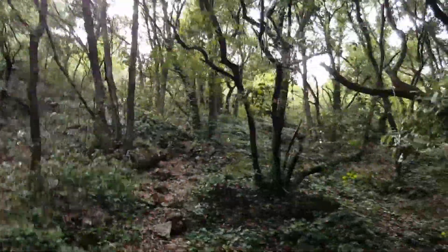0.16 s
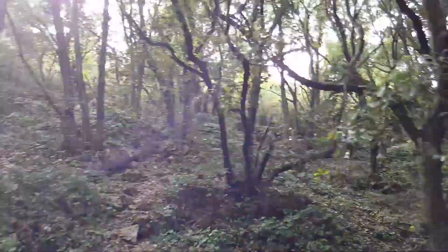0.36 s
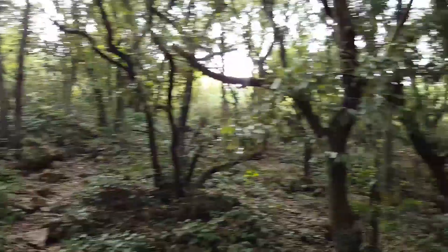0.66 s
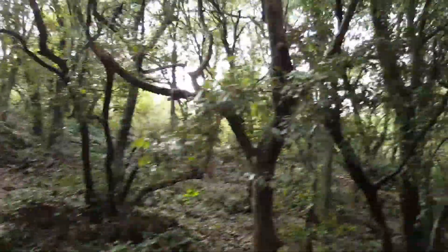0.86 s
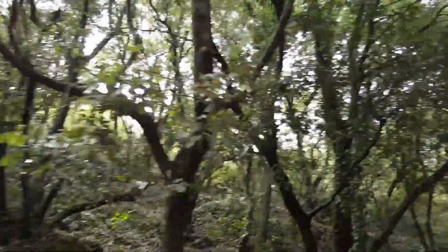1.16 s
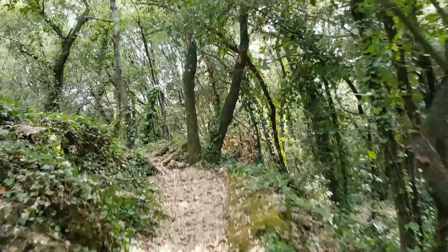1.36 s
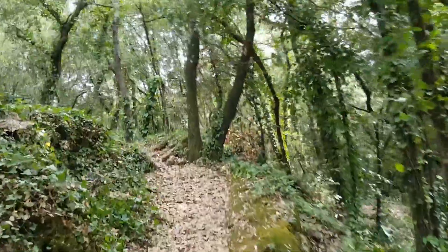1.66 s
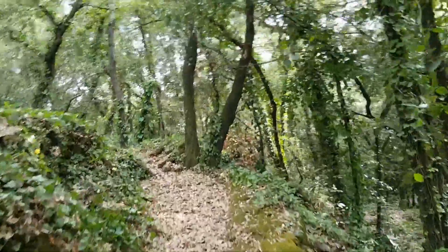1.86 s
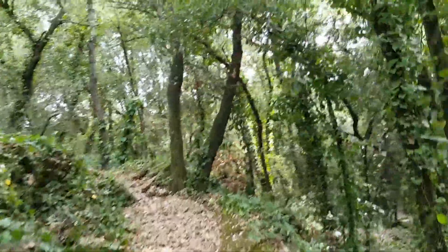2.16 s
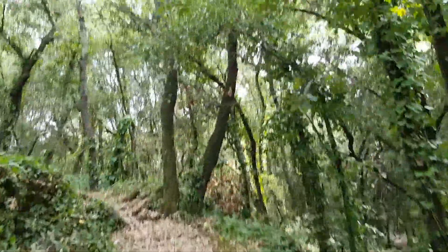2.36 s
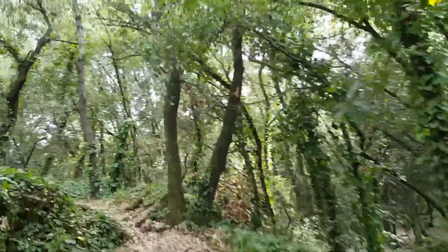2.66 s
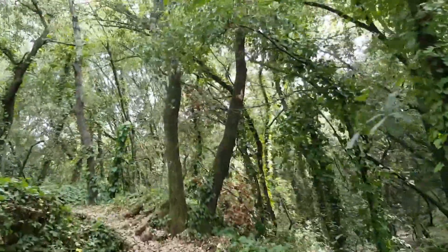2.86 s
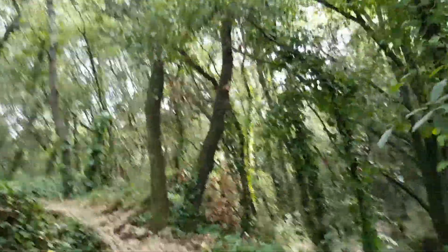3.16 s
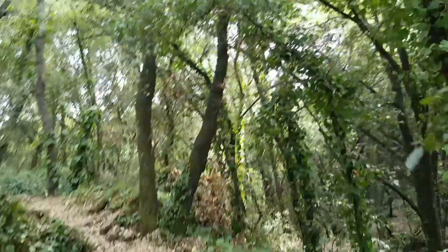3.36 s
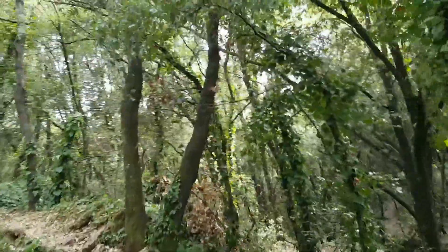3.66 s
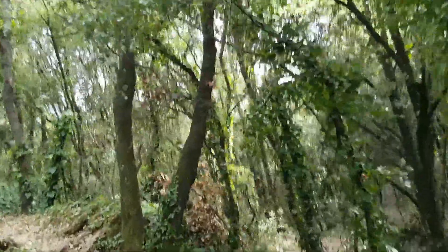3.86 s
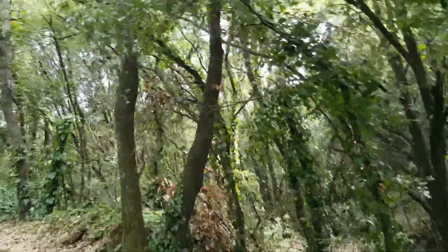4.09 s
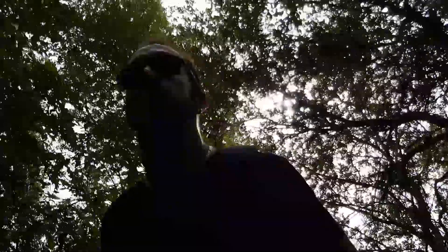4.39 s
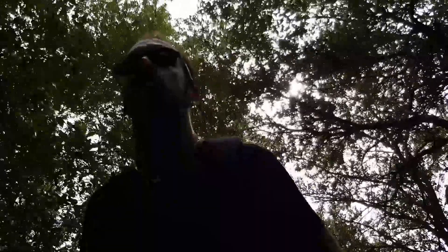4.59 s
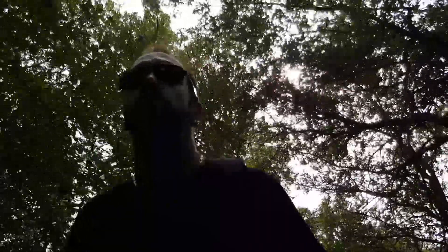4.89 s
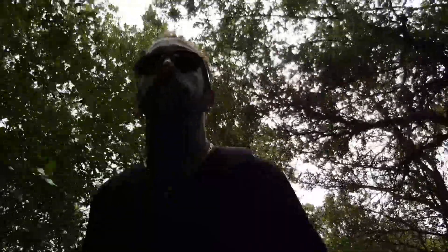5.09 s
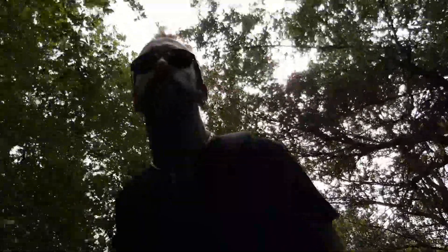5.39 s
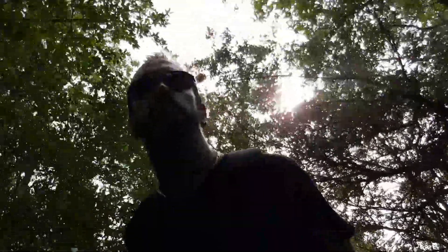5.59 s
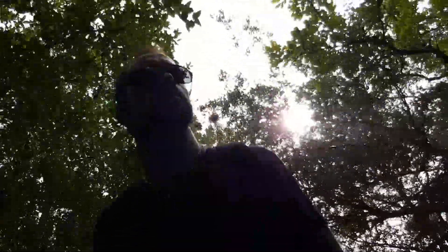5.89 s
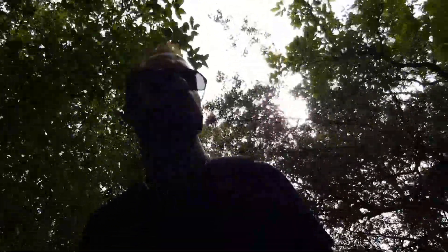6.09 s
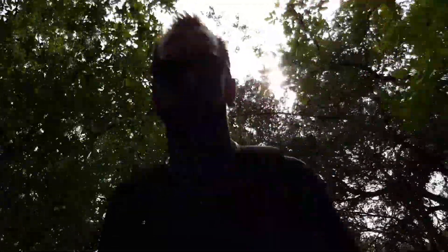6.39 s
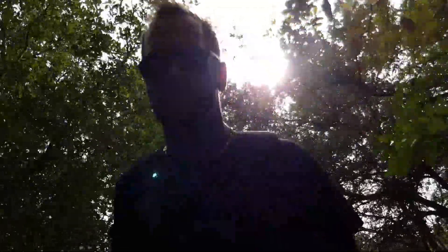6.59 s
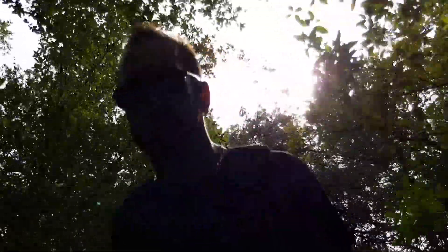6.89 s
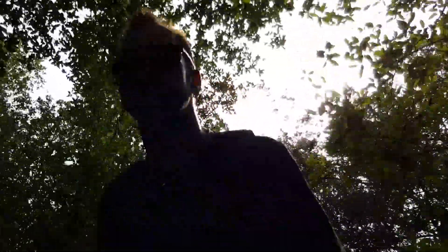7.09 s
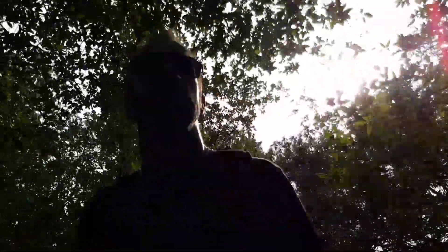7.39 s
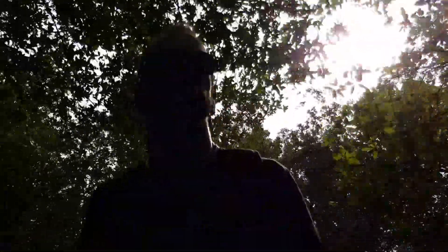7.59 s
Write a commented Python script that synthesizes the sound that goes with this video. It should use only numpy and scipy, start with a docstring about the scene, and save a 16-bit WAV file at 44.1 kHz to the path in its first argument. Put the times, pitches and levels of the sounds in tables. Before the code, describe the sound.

Summer woodland filled with bright, dry, rasping cicadas. Each near singer makes rapid bursts of fine clicks at its own pace, so the pulses interlock into a shimmering, rattling texture. A softer far crowd and a steady hush of air and leaves fill the gaps. Faint handling rumble fades early; low uneven noise peaks halfway. The level stays even throughout, with short diffuse echoes and very wide stereo.

```python
"""From the first moment four near cicadas rasp in summer woodland, each chirping at its own tempo to the end.
Each chirp is a run of tymbal clicks that ring the insect's body and scatter among trunks and leaves.
Narrow whistles swell with three of the singers; a blurred crowd of far ones and a soft wash lie beneath.
A faint rumble of a camera being swung sinks over the opening seconds; soft, uneven low noise in the centre
is strongest near 3.5 s. The stereo is very wide throughout, with a faint wavering hum in its centre."""
import sys
import numpy as np
from scipy import signal
from scipy.fft import rfft, irfft, next_fast_len
from scipy.io import wavfile
from scipy.ndimage import uniform_filter1d, minimum_filter1d

SR = 44100
rng = np.random.default_rng(int(sys.argv[2]) if len(sys.argv) > 2 else 0)


def inscribe(sig):
    """Save sig as 16-bit PCM at rate SR to the path in sys.argv[1].

    A 1-D sig is mono; a 2-D sig holds one channel per row.
    Samples are clipped to [-1, 1] before scaling.
    """
    pcm = np.round(np.clip(np.atleast_2d(sig).T, -1, 1) * 32767)
    wavfile.write(sys.argv[1], SR, pcm.astype(np.int16))


N = 341543
TIME = np.arange(N) / SR  # s

# chirps of each near singer: t/s (middle of the chirp), relative level/dB
SLOW_CHIRPS = [(-0.033, 0.1), (0.137, 0.3), (0.308, -0.1), (0.491, -0.2), (0.655, 0.8), (0.829, -0.1),
               (0.989, -0.0), (1.174, -4), (1.332, -2.1), (1.526, -0.7), (1.669, -1.8), (1.85, -1.4),
               (2.006, -1.1), (2.177, -0.8), (2.358, -0.8), (2.53, 1.0), (2.7, 1.0), (2.878, -0.7),
               (3.068, -1.0), (3.215, -1.6), (3.387, -0.8), (3.545, -0.2), (3.791, -0.5), (3.964, 0.6),
               (4.159, 0.8), (4.335, 0.4), (4.52, 0.5), (4.701, 0.5), (4.882, -0.1), (5.048, 1.2),
               (5.235, -1.2), (5.405, 0.4), (5.576, 1.4), (5.753, 1.1), (5.917, -0.5), (6.096, -1.2),
               (6.263, -1), (6.436, -1.2), (6.62, 0.6), (6.8, 0.4), (6.959, -0.1), (7.135, 0.1),
               (7.3, -1.1), (7.485, 0.4), (7.657, 0.4), (7.816, 0.0)]
QUICK_CHIRPS = [(-0.115, 0.0), (0.036, 0.4), (0.185, 0.4), (0.322, 1.1), (0.469, 1.3), (0.616, 1.6),
                (0.749, -1.5), (0.889, 0.3), (1.024, 0.6), (1.164, -0.8), (1.312, 1.2), (1.442, -1.5),
                (1.595, -3), (1.742, 1.2), (1.878, 2.0), (2.025, 1.4), (2.185, 0.7), (2.328, 1.0),
                (2.483, -0.3), (2.618, -1.8), (2.76, -6), (2.92, -0.4), (3.052, 1.1), (3.187, 0.7),
                (3.365, -4), (3.496, -0.7), (3.632, 1.1), (3.785, -0.3), (3.945, 0.0), (4.07, 1),
                (4.231, 0.0), (4.395, 0), (4.51, 0.6), (4.685, -0.7), (4.837, -0.9), (4.958, 0.7),
                (5.13, -0.1), (5.265, -0.3), (5.405, -1.1), (5.57, -0.8), (5.692, -0.9), (5.86, -1.5),
                (6.009, 0.2), (6.134, 0.5), (6.305, -0.1), (6.418, -0.8), (6.558, -0.9), (6.716, -1.3),
                (6.865, -1.2), (7.031, -0.7), (7.175, -1.8), (7.327, -1.6), (7.477, -1.3), (7.618, -1.2),
                (7.776, -0.2)]
SHRILL_CHIRPS = [(-0.137, 0.0), (-0.0, -0.2), (0.175, -0.5), (0.362, -0.5), (0.56, 0.5), (0.749, -0.2),
                 (0.965, 0.8), (1.163, -1.5), (1.341, 0.0), (1.518, 0.4), (1.701, 0.9), (1.914, 0.8),
                 (2.1, -0.2), (2.295, 0.2), (2.486, -0.9), (2.654, -0.8), (2.87, 1.0), (3.075, -0.5),
                 (3.242, 0.3), (3.438, 0.2), (3.624, 0.8), (3.805, -0.5), (4.001, -0.2), (4.183, -0.3),
                 (4.352, -0.6), (4.562, -0.2), (4.761, 1.2), (4.938, -0.0), (5.132, 0.4), (5.307, 0.6),
                 (5.505, 0.0), (5.709, -0.2), (5.887, -0.2), (6.047, -1.0), (6.227, -0.9), (6.381, -0.2),
                 (6.622, 0.6), (6.823, -0.0), (6.999, 0.3), (7.191, -1.1), (7.395, -0.4), (7.586, -0.8),
                 (7.785, 0.7)]
THIN_CHIRPS = [(-0.134, 0.0), (0.039, -0.9), (0.216, -0.6), (0.398, -0.3), (0.572, -0.5), (0.736, -0.7),
               (0.885, -0.5), (1.071, -0.5), (1.253, -0.4), (1.418, -0.7), (1.606, -0.9), (1.777, 0.4),
               (1.942, -0.1), (2.138, 0.5), (2.285, -0.3), (2.453, -0.2), (2.667, -0.9), (2.845, 0.2),
               (3.013, 0.7), (3.227, 0.1), (3.397, 1.1), (3.593, -0.0), (3.778, 0.6), (3.94, 0.9),
               (4.128, 0.1), (4.313, 0.1), (4.482, 0.6), (4.663, -0.5), (4.856, -0.3), (5.026, 0.6),
               (5.191, 0.5), (5.346, -0.0), (5.565, -0.5), (5.743, -0.3), (5.933, -0.4), (6.121, -0.2),
               (6.304, 0.3), (6.511, 1.0), (6.678, 0.5), (6.864, 0.5), (7.027, -0.1), (7.216, -0.3),
               (7.371, 0.8), (7.545, 0.2), (7.729, 0.3), (7.894, -0.0)]
# body resonances of each near singer and of the far crowd: f/Hz, relative level/dB
SLOW_BODY = [(700, -61), (1750, -29.5), (2170, -12.5), (3150, -26), (3680, -40), (3950, -8), (4350, -3),
             (5150, 0.5), (5800, -4), (6300, -6), (7400, -6), (8500, -17), (9200, -25.5), (11000, -44.5),
             (15500, -32.5)]
QUICK_BODY = [(400, -58), (1700, -25), (2330, -13), (3700, -21), (4390, 12.5), (5510, 8), (6550, 7),
              (6890, 7.5), (8100, 7), (8800, -46), (10420, -9), (11540, -31), (12830, -19), (13610, -24),
              (15590, -28)]
SHRILL_BODY = [(400, -56), (1720, -21), (2200, -9), (3000, -13), (3700, -21.5), (4300, 2), (4580, -3.5),
               (5000, -5.5), (5400, -1.5), (6050, -7.5), (6800, -0.5), (8600, -16.5), (9300, -10),
               (11500, -49), (15500, -51)]
THIN_BODY = [(1300, -75), (1900, -22), (2500, -11), (3700, -20), (4570, 5), (6550, -8), (6800, -4),
             (10340, -18.5), (10940, -11), (11370, -23.5), (11970, -19), (12580, -21), (13870, -28),
             (15590, -66)]
FAR_BODY = [(400, -82), (1700, -28.5), (2230, -10.5), (2650, -24.5), (3150, -10.5), (3700, -18),
            (4050, -16.5), (4750, 4), (5450, 1.5), (6300, -12.5), (6950, 0.5), (8400, -18), (10900, -20.5),
            (11800, -31.5), (12600, -22.5), (13600, -53), (15500, -47)]
# narrow whistles that swell with a singer's chirps, as overtones of its click rate, reflections
# and resonances do: f/Hz, width/Hz, level/dB
SHRILL_WHISTLES = [(4376, 70, -30), (4584, 70, -30), (4715, 110, -35), (5250, 380, -31)]
QUICK_WHISTLES = [(7255, 220, -37), (8480, 330, -39.5), (9350, 240, -47.5)]
THIN_WHISTLES = [(10520, 70, -57), (10950, 140, -51), (12592, 150, -55.5), (13390, 60, -65)]
# spectrum of the distant wash of air and leaves: f/Hz, relative level/dB
WASH = [(30, -17), (60, -17), (100, -10), (170, -11), (300, -2.5), (400, 4.5), (480, 7.5), (620, 9),
        (800, 8.5), (1000, 5.5), (1600, 1), (3000, -1), (12000, -20)]
# soft, uneven low noise, ahead of the stereo widening: t/s, level/dB
LOW_NOISE = [(0, -66), (.8, -70), (1.8, -67), (2.4, -62.5), (3.5, -60), (4.5, -70.5), (7.7, -68)]
# low rumble as the camera is swung round, ahead of the stereo widening: t/s, level/dB
RUMBLE = [(0, -68), (.7, -68), (1.3, -72), (1.9, -74), (2.5, -80), (4, -80), (7.7, -90)]
# spectra of the low noise and of the rumble: f/Hz, relative level/dB
LOW_NOISE_TONE = [(8, -28), (45, -26), (95, 8), (160, 11), (260, -6.5), (500, -29), (2000, -80)]
RUMBLE_TONE = [(8, 6), (25, -12), (55, -7), (90, -11), (200, -40), (600, -90)]
# how much of the two channels' average is kept beside their difference: f/Hz, level/dB
CENTRE = [(30, 2.5), (110, -14), (200, -22.5), (290, -31.5), (650, -15), (1000, -23), (1500, -50.5),
          (2150, -6.5), (4500, -6), (7000, -10.5), (11000, -7), (15000, -10)]
# how much of the difference leaks into the centre, so the treble leans left: f/Hz, level/dB
TREBLE_LEAN = [(1200, -80), (2500, -49), (4500, -22.5)]

LEAD_S = .007  # each singer's effort runs this far ahead of the beat, as its echoes take time to build
BUILD_S = 0.00097  # time constant of a click's echoes building up
WHISTLE_WANDER_HZ = 14  # rms
UNEVEN_DB, UNEVEN_PER_S = 11, 20  # level swings of the low noise: greatest reach, targets a second
HUM_HZ, HUM_DB = 750, -68.5
LIMIT_PEAK, LIMIT_S = .75, .006  # full scale = 1; length of each smoothing window
EDGE_HZ = 15750  # upper band limit


def amp(db):
    """Turns decibels into gain."""
    return 10 ** (np.asarray(db) / 20)


def unit(x):
    """Scales to rms 1."""
    return x / np.sqrt(np.mean(x ** 2) + 1e-20)


def colour(x, points):
    """Filters by a spectrum of (f/Hz, level/dB) points, joined on a log frequency axis."""
    size = next_fast_len(N + 4096)
    hz, db = np.transpose(points)
    log_hz = np.log(np.fft.rfftfreq(size, 1 / SR) + 1)
    gain = amp(np.interp(log_hz, np.log(hz), db))
    return irfft(rfft(x, size) * gain, size)[..., :N]


def drift(per_s):
    """Smooth random wandering of rms 1, with per_s new targets a second."""
    knots = rng.standard_normal(4096)
    path = np.interp(TIME * per_s, np.arange(len(knots)), knots)
    return unit(uniform_filter1d(path, int(SR / per_s / 2) + 1))


def effort(chirps, duty, swell_db):
    """Each chirp rises, holds and fades over a share of its cycle, tilted by swell_db per cycle."""
    times, db = np.transpose(chirps)
    beat = np.interp(TIME + LEAD_S, times, np.arange(len(times)))
    nearest = np.round(beat).astype(int)
    db = np.pad(db, 1, "edge")
    power = np.zeros(N)
    for k in (nearest - 1, nearest, nearest + 1):  # neighbouring chirps overlap
        late = beat - k
        shape = amp(swell_db * late) * np.exp(-(2 * late / duty) ** 4)
        power += (amp(db[k + 1]) * shape) ** 2
    return np.sqrt(power)


def tymbals(force, click_hz, waver, weak_share, jitter_s, uneven_db, sag):
    """Two tymbals buckle in turn, the second scaled by weak_share; they slow as the effort fades."""
    rate = click_hz * (1 + sag * (np.minimum(force, 1) - 1) + waver * drift(14))
    at = np.flatnonzero(np.diff(np.floor(np.cumsum(rate) / SR)) > 0)
    chance = rng.standard_normal((4000, 2))[:len(at)]
    turn = np.where(np.arange(len(at)) % 2, weak_share, 1)
    size = force[at] * amp(uneven_db * chance[:, 0]) * turn
    jitter = (jitter_s * SR * chance[:, 1]).astype(int)
    return np.bincount(np.clip(at + jitter, 0, N - 1), size, N)


def scatter(clicks, t60, count=12):
    """Each click dies away as a burst of echoes, unlike in each channel; the echo paths keep changing."""
    t = np.arange(int(min(t60, .5) * SR) + 8) / SR
    tails = rng.standard_normal((count, 2, SR // 2 + 8))[..., :len(t)] * amp(-60 * t / t60)
    tails = tails * (1 - np.exp(-t / BUILD_S))
    tails /= np.linalg.norm(tails, axis=2, keepdims=True)
    # the sets of echoes take turns, with loose borders between turns
    path = (TIME * count + 2 * rng.random(N)).astype(int) % count
    out = np.zeros((2, N + len(t)))
    for i in np.flatnonzero(clicks):
        out[:, i:i + len(t)] += clicks[i] * tails[path[i]]
    return out[:, :N]


def near_cicada(clicks, body, level_db, ring_t60, leaves_db, leaves_t60, wood_db, wood_t60):
    """The body's short ring, opposed in the two channels, plus scatter off leaves and the wood's echo."""
    ring = scatter(clicks, ring_t60)[0] * np.array([[1], [-1]])
    leaves = amp(leaves_db) * scatter(clicks, leaves_t60)
    wood = amp(wood_db) * scatter(clicks, wood_t60)
    return amp(level_db) * unit(colour(ring + leaves + wood, body))


def whistles(table, force, steady_share):
    """Fuzzy, wandering narrow bands of noise that swell with a singer's chirps and linger between them."""
    out = np.zeros((2, N))
    for hz, width, db in table:
        pole = np.exp(-np.pi * width / SR)
        turn = np.exp(2j * np.pi * np.cumsum(hz + WHISTLE_WANDER_HZ * drift(3)) / SR)
        # slow complex noise, turned up to the whistle's pitch
        blur = signal.lfilter([1], np.poly([pole, pole]), rng.standard_normal((2, 2, N)))
        out += amp(db) * unit(((blur[0] + 1j * blur[1]) * turn).real)
    return out * unit(steady_share + force)


def far_cicadas(level_db, chirps_per_s, depth_db, count=4):
    """Several far singers, each at its own tempo and click rate, blurred by the wood."""
    clicks = np.zeros(N)
    for tempo, pitch, start in rng.uniform(-1, 1, (count, 3)):
        beat = np.cumsum(chirps_per_s * (1 + .25 * tempo + .06 * drift(2))) / SR + start
        force = amp(depth_db * (np.sin(2 * np.pi * beat) - 1))
        clicks += tymbals(force, 210 * (1 + .12 * pitch), waver=.02, weak_share=0.33,
                          jitter_s=.0003, uneven_db=5.0, sag=.05)
    return amp(level_db) * unit(colour(scatter(clicks, t60=0.13), FAR_BODY))


def wash(level_db, swell_db=.4, band_db=1.1):
    """Soft, nearly steady noise of distant air and leaves: seven overlapping bands, slight level changes."""
    hz = np.fft.rfftfreq(N, 1 / SR)
    place = np.clip(2 * np.log2((hz + 1) / 250), 0, 6)  # half octaves; the end bands stay open
    noise = rfft(rng.standard_normal((2, N)))
    air = np.zeros((2, N))
    for k in range(7):
        band = irfft(noise * np.maximum(1 - abs(place - k), 0), N)
        air += band * amp(band_db * drift(16))
    return amp(level_db + swell_db * drift(3.49)) * unit(colour(air, WASH))


def camera_rumble():
    """Deep noise, alike in both channels, as the camera is swung round."""
    rumble = unit(colour(rng.standard_normal(N), RUMBLE_TONE))
    return amp(np.interp(TIME, *np.transpose(RUMBLE))) * rumble


def low_noise():
    """Soft, uneven low noise in the centre, alike in both channels and strongest near 3.5 s."""
    uneven = amp(UNEVEN_DB * np.tanh(drift(UNEVEN_PER_S)))
    noise = unit(colour(rng.standard_normal(N) * uneven, LOW_NOISE_TONE))
    return amp(np.interp(TIME, *np.transpose(LOW_NOISE))) * noise


def scene():
    """Layers the near chorus and its whistles over the far singers, the wash, the rumble and the low noise."""
    slow_force = effort(SLOW_CHIRPS, duty=.52, swell_db=4.0)
    quick_force = effort(QUICK_CHIRPS, duty=.68, swell_db=-1.0)
    shrill_force = effort(SHRILL_CHIRPS, duty=.72, swell_db=-.4)
    thin_force = effort(THIN_CHIRPS, duty=0.73, swell_db=0.78)

    slow = tymbals(slow_force, click_hz=212, waver=.025, weak_share=0.78,
                   jitter_s=.00014, uneven_db=0.7, sag=.1)
    quick = tymbals(quick_force, click_hz=221.1, waver=.025, weak_share=1.0,
                    jitter_s=.00014, uneven_db=1.0, sag=.05)
    shrill = tymbals(shrill_force, click_hz=207.4, waver=.008, weak_share=1.0,
                     jitter_s=.00012, uneven_db=-0.3, sag=.05)
    thin = tymbals(thin_force, click_hz=301.5, waver=.02, weak_share=0.32,
                   jitter_s=.00016, uneven_db=-1.0, sag=.05)

    # every t60 is the time in seconds to fall by 60 dB
    out = near_cicada(slow, SLOW_BODY, level_db=-21.1, ring_t60=0.015,
                      leaves_db=0, leaves_t60=0.04, wood_db=-16, wood_t60=0.6)
    out += near_cicada(quick, QUICK_BODY, level_db=-22.5, ring_t60=0.0029,
                       leaves_db=-3.0, leaves_t60=0.029, wood_db=-6.0, wood_t60=0.52)
    out += near_cicada(shrill, SHRILL_BODY, level_db=-25.0, ring_t60=0.022,
                       leaves_db=1.5, leaves_t60=0.078, wood_db=-38.0, wood_t60=0.32)
    out += near_cicada(thin, THIN_BODY, level_db=-27.0, ring_t60=0.0037,
                       leaves_db=21.0, leaves_t60=0.065, wood_db=-10, wood_t60=0.42)

    out += whistles(SHRILL_WHISTLES, shrill_force, steady_share=.3)
    out += whistles(QUICK_WHISTLES, quick_force, steady_share=.25)
    out += whistles(THIN_WHISTLES, thin_force, steady_share=.15)
    out += far_cicadas(level_db=-23.0, chirps_per_s=6.3, depth_db=1.88)
    return out + wash(level_db=-40.5) + camera_rumble() + low_noise()


def centre_hum():
    """A faint sine that wavers in pitch and level."""
    phase = 2 * np.pi * np.cumsum(HUM_HZ + 3 * drift(24)) / SR
    return amp(HUM_DB) * unit(np.sin(phase) * amp(2.0 * drift(9.7)))


def limit(x):
    """A limiter eases the gain of both channels down around the highest peaks."""
    size = int(LIMIT_S * SR) | 1
    gain = minimum_filter1d(LIMIT_PEAK / np.maximum(abs(x).max(0), LIMIT_PEAK), 2 * size)
    return x * uniform_filter1d(uniform_filter1d(gain, size), size)


def record(dry):
    """Widening thins the centre so the channels are mostly opposed; then hum, limiter and band limit."""
    side = (dry[0] - dry[1]) / 2
    mid = colour(dry.mean(0), CENTRE) + centre_hum()
    mid += colour(side, TREBLE_LEAN)
    wide = limit(np.array([mid + side, mid - side]))
    lowpass = signal.firwin(1023, EDGE_HZ, window=("kaiser", 9), fs=SR)
    return signal.oaconvolve(wide, lowpass[None], "same", axes=1)


dry = scene()
out = record(dry)
inscribe(out)
```